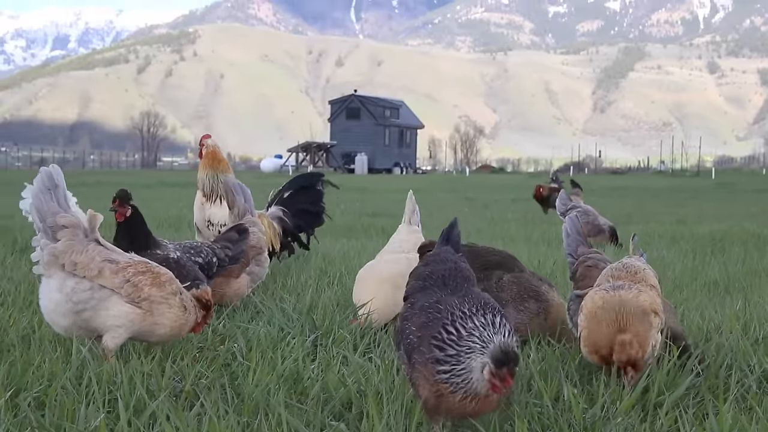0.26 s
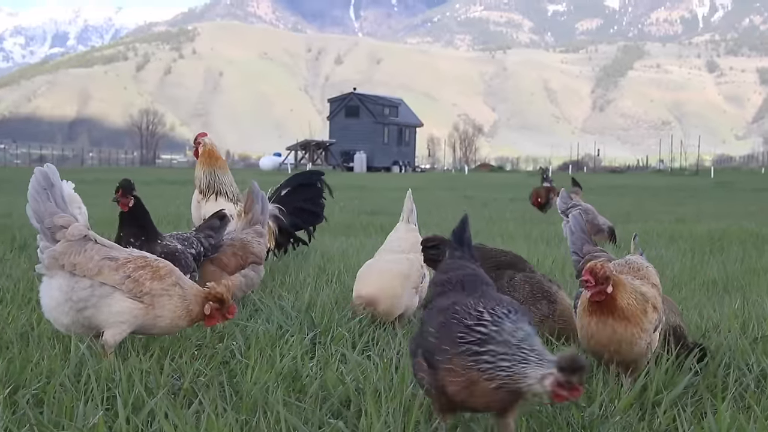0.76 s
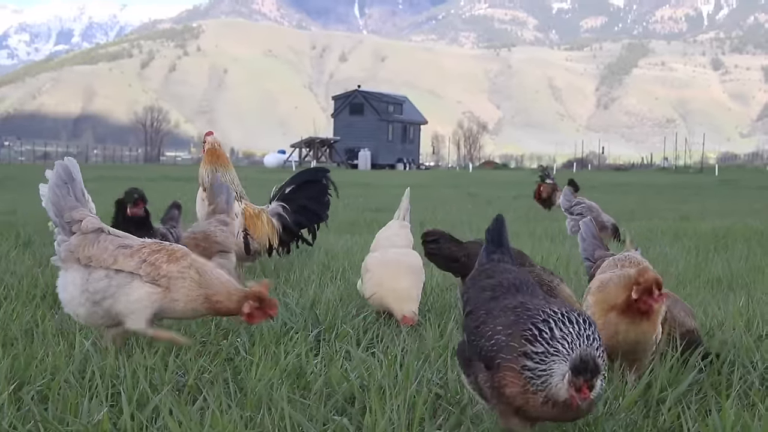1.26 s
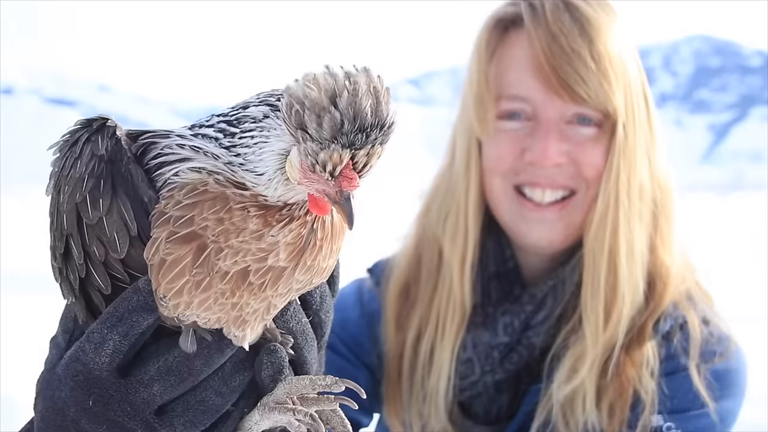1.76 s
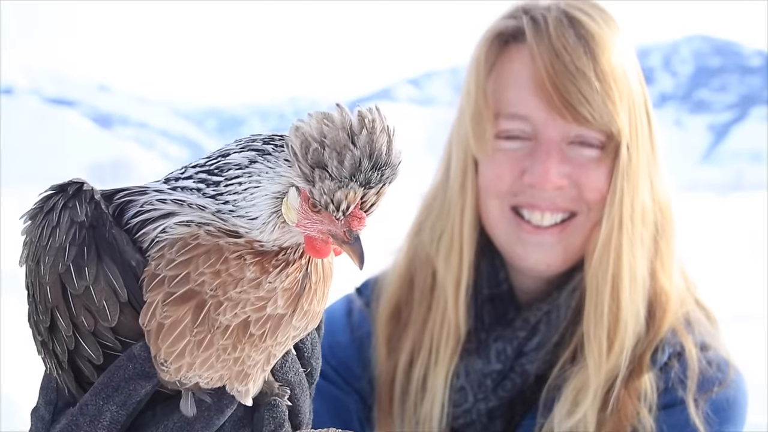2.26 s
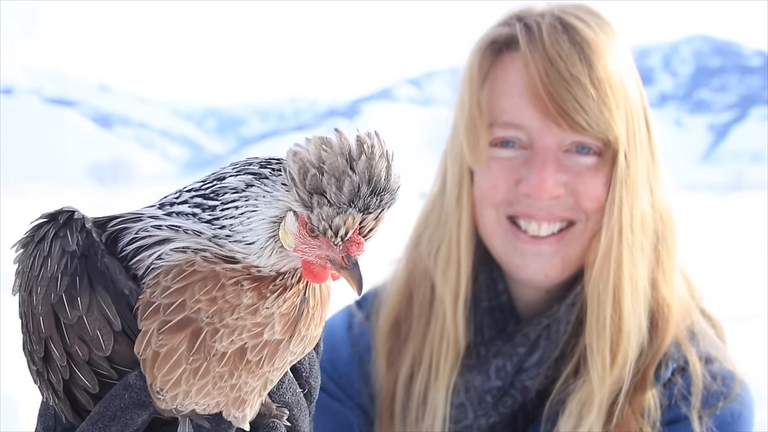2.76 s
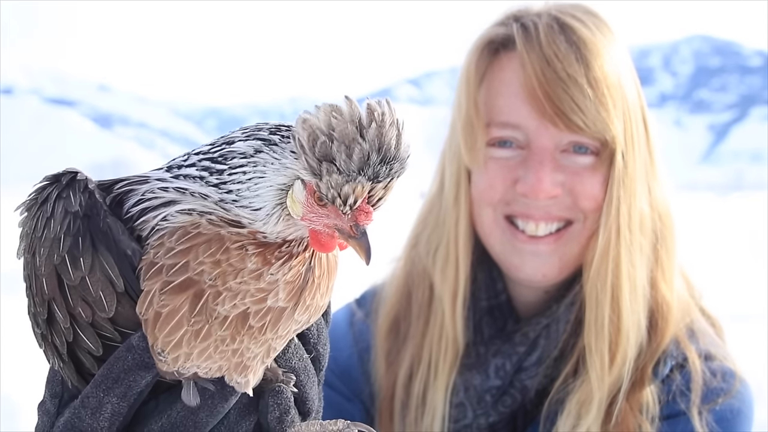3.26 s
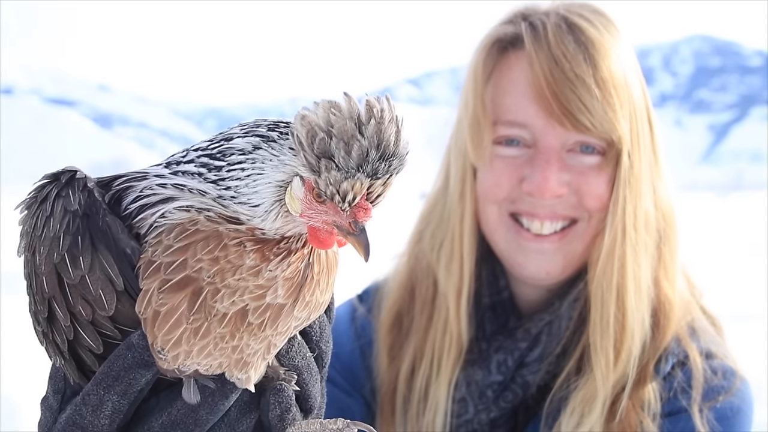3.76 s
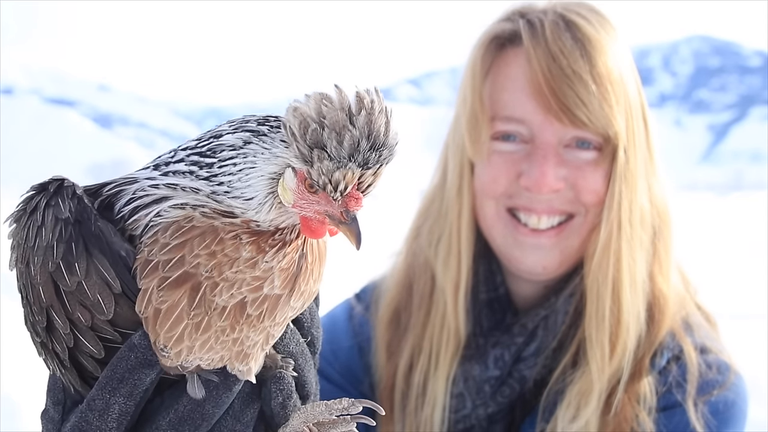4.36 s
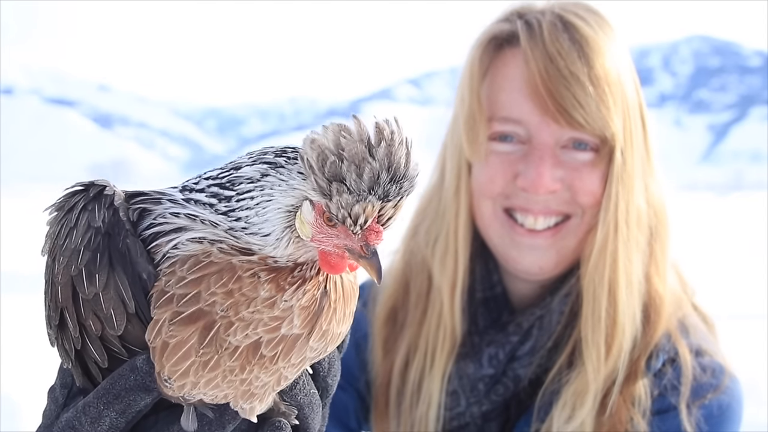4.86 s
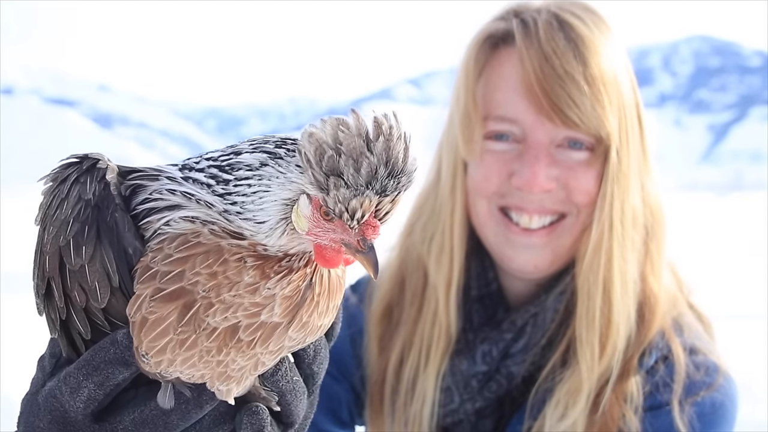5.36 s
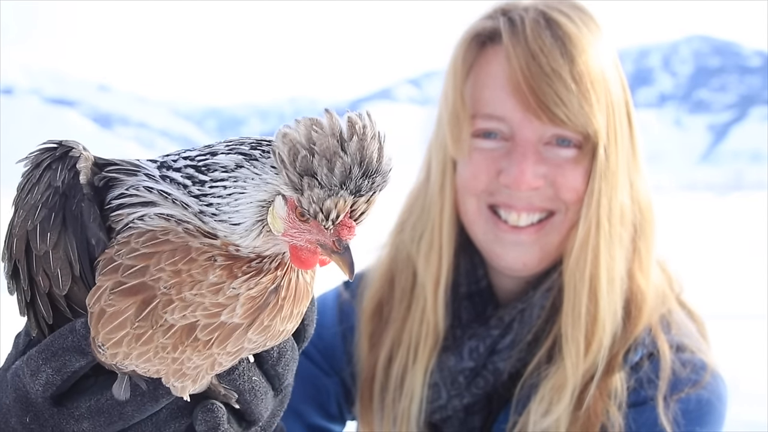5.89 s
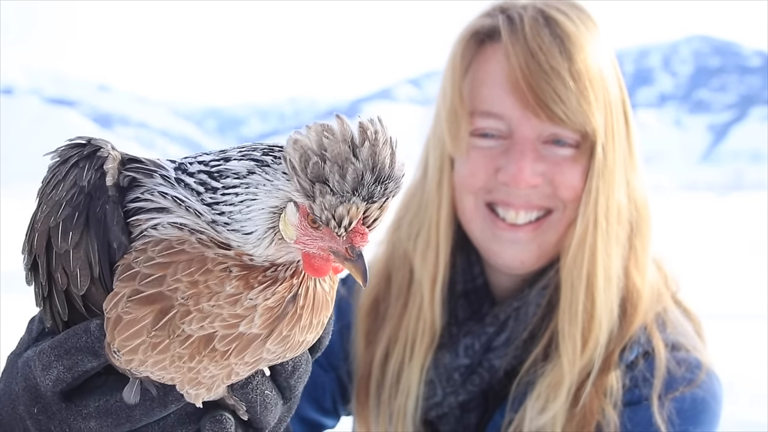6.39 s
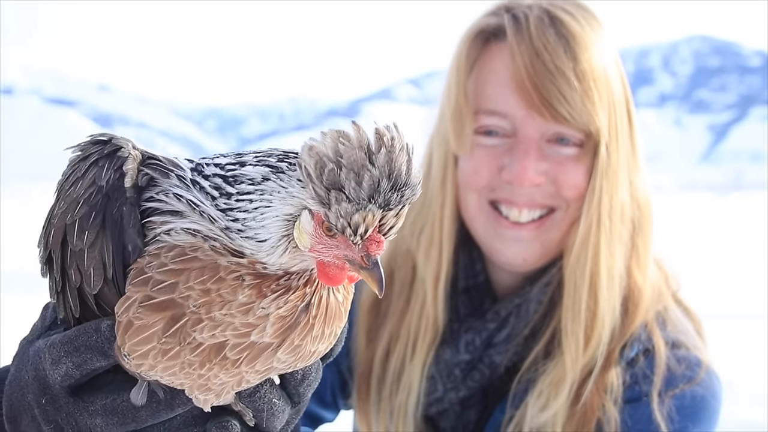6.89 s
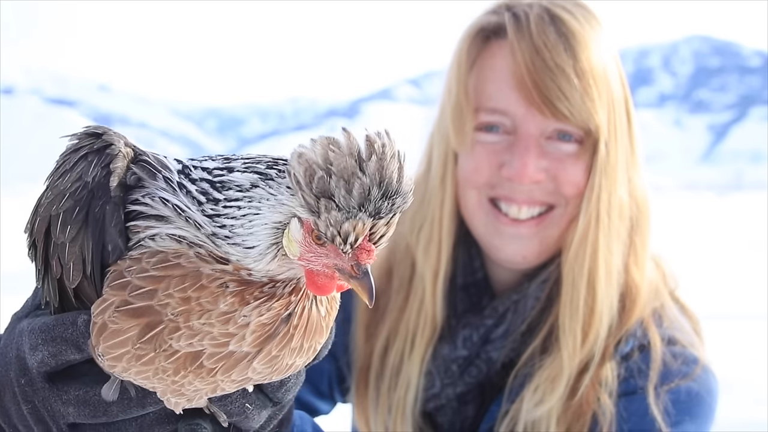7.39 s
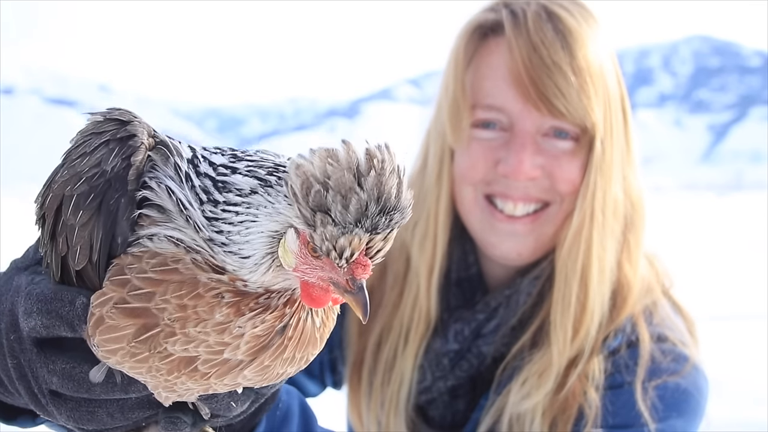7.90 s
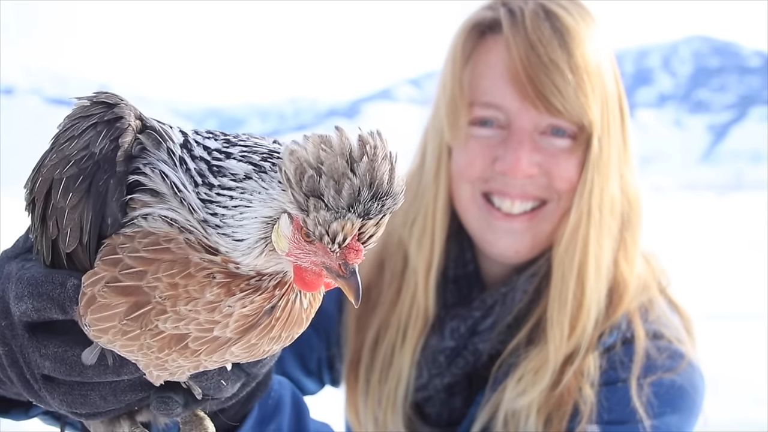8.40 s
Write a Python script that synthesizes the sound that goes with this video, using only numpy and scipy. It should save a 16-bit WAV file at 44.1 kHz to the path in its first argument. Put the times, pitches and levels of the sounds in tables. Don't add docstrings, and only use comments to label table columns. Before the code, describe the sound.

Wind buffeting rumbles heavily over hens brushing through grass, then stops at a hard edit. Close to the microphone, a hen gives evenly spaced nasal clucks, about four or five per second, interrupted by two rising squawks that break off. The doorway sounds small and dry, with light claw scratches and late wooden thumps. A distant hen, tiny bird chirps and a faint engine sit above low yard hum.

```python
import sys
import numpy as np
from scipy import signal
from scipy.io import wavfile
from scipy.ndimage import uniform_filter1d

SR = 44100
rng = np.random.default_rng(int(sys.argv[2]) if len(sys.argv) > 2 else 0)


def waveform_to_disk(signal):
    frames = np.transpose(np.atleast_2d(signal))
    scaled = np.clip(frames, -1, 1) * 32767
    samples = np.round(scaled).astype(np.int16)
    wavfile.write(sys.argv[1], SR, samples)


def linear_from_db(decibels):
    return 10 ** (np.asarray(decibels, float) / 20)


N = 381024
FIELD_END_S, SHED_START_S = 1.7478, 1.787

# t of top pitch/s, level/dB, top f/Hz, hold/s, rise/s
CLUCKS = [(2.06, -19.5, 475.3, .015, 0.023), (2.307, -21, 447, .035, .023), (2.528, -22, 440, 0.037, .035),
          (2.747, -20, 455.7, 0.028, 0.03), (3.214, -15.5, 539, .026, .028), (3.432, -19.5, 470, .04, .025),
          (3.654, -21.5, 452, .025, .031), (3.929, -26, 373, 0.023, .025), (4.163, -26, 405, 0.017, 0.034),
          (4.411, -28.5, 392, 0.015, .021), (5.249, -22.5, 452.4, .03, 0.019), (5.939, -26, 387, .02, .025),
          (6.148, -25.5, 436.7, .028, .028), (6.352, -24.5, 439, .03, 0.021),
          (6.582, -22, 465.3, 0.034, .028), (7.017, -18.5, 557, .03, .022), (7.222, -16, 485, 0.028, .029),
          (7.442, -21.5, 455.6, 0.025, .028), (7.688, -22.5, 450, .028, 0.03),
          (7.883, -20.5, 458.1, .04, .018), (8.111, -20, 452.7, .032, .028), (8.336, -20, 458, .035, .032),
          (8.53, -20.5, 449, .033, .022)]
# t of top pitch/s, level/dB, top f/Hz, hold/s, rise/s
CATCH_BREATHS = [
    (1.798, -22.5, 442.4, 0.027, .009),
    (2.08, -21, 451.6, 0.018, .0077),
    (3.04, -22.5, 472, .03, .006),
    (3.241, -21.5, 482, 0.018, .006),
    (7.463, -21.5, 468, 0.012, .005),
]
# t of top pitch/s, level/dB, top f/Hz, hold/s, rise/s
FAR_CLUCKS = [
    (3.786, -50, 461, 0.039, 0.026),
    (4.606, -43.5, 445, .035, 0.011),
    (4.851, -49.5, 404, 0.016, .01),
    (5.041, -45, 453, 0.035, .017),
    (5.485, -44, 460, 0.035, .02),
    (5.74, -45.5, 451, .04, .018),
]
# t/s, level/dB, f/Hz
SQUAWKS = [
    [(2.808, -22.5, 450), (2.819, -16, 591), (2.85, -12, 616.7), (2.88, -15.5, 629.2), (2.968, -13, 642),
     (2.984, -15.5, 685.5), (2.997, -14, 688), (3.018, -21.5, 643), (3.04, -23.5, 492)],
    [(6.635, -21, 508), (6.646, -14.5, 609.3), (6.7, -12.5, 617.2), (6.75, -16.5, 621.8),
     (6.772, -22.5, 633), (6.79, -13, 649), (6.828, -14, 676.6), (6.838, -23.5, 647), (6.866, -24.5, 528)],
]
# t/s, level/dB, f/Hz
FAR_SQUAWKS = [
    [(4.55, -58.5, 609), (4.585, -51.5, 662), (4.68, -56, 676), (4.74, -63, 670), (4.77, -62, 616)],
    [(6.89, -37.5, 657), (6.95, -36.5, 675), (7.03, -38.5, 683), (7.11, -54, 672)],
]
# t/s, level/dB, f/Hz
CROAK = [
    (1.829, -30.5, 220.7),
    (1.85, -29.5, 201.4),
    (1.869, -39, 194),
]
# f/Hz, level/dB
SHUT_BEAK = [(150, -20), (450, -14.5), (900, 8.5), (1150, 8.5), (1400, -16), (1600, -24), (1900, -25),
             (2300, -22), (2750, -33), (3300, -21), (3750, -25), (4500, -40), (6000, -53), (16000, -72)]
# f/Hz, level/dB
OPEN_BEAK = [(300, -30.5), (620, -17.5), (700, -19), (950, 7), (1300, -3.5), (1450, -14.5), (1850, -30.5),
             (2100, -20), (2600, -22), (3300, -27), (4200, -33.5), (6000, -44), (10000, -54), (16000, -70)]
# f/Hz, level/dB
FAR_PIPE = [(300, -29), (670, -10.5), (900, 11), (1350, 0.5), (1650, -22), (2050, -17), (2700, -25),
            (4000, -29), (16000, -62)]
# f/Hz, level/dB
LOW_THROAT = [(100, -13), (240, 5), (550, -10), (1000, 4), (1450, -19), (2000, -10.5), (2500, -33),
              (3300, -17.5), (4200, -41), (16000, -58.5)]
# f/Hz, t60/s
SHED_T60 = [(200, 0.072), (900, 0.091), (2000, 0.18), (8000, 0.026)]
# t/s, peak level/dB, f/Hz, t60/s, boom level/dB
THUMPS = [
    (3.871, -35.5, 215.7, 0.15, -40.5),
    (7.006, -24.5, 156.6, 0.017, -43.5),
    (7.862, -15.5, 290.3, 0.015, -74),
    (8.013, -25, 201, 0.073, -43.5),
    (8.086, -26.5, 217, 0.083, -44.5),
    (8.403, -37.5, 274, 0.073, -54.5),
]
# t/s, peak level/dB, centre f/Hz, t60/s
TICKS = [(0.1065, -39.5, 2000, 0.02), (0.3954, -36, 1670, 0.02), (0.474, -47, 1500, 0.016),
         (0.9367, -27, 3600, 0.013), (1.5776, -18.5, 3690, 0.007), (1.5977, -29.5, 1860, 0.013),
         (3.8027, -32, 3060, 0.037), (3.8122, -30.5, 2830, 0.022), (3.8332, -36.5, 2720, 0.034),
         (3.8688, -35, 2740, 0.028), (3.896, -35.5, 2990, 0.0245), (7.862, -31, 1510, 0.017),
         (8.401, -37.5, 1700, 0.042)]
# t/s, level/dB, centre f/Hz, t60/s
SCUFFS = [
    (1.787, -42, 1520, 1.3),
    (8.005, -42.5, 1800, 0.26),
    (3.872, -23, 216, 0.51),
    (21, -28.5, 200, 0.52),
]
# t/s, gust level/dB
WIND = [(0.0, -40.5), (0.102, -40.5), (0.306, -19), (0.398, -22.5), (0.424, -2.5), (0.472, -18),
        (0.536, 1.5), (0.56, -15), (0.612, -13.5), (0.676, -28.5), (0.75, -21.5), (0.926, -35),
        (0.964, -17.5), (1.096, -18.5), (1.218, -27.5), (1.31, -23.5), (1.344, -36.5), (1.75, -20.5)]
# f/Hz, level/dB per Hz
GUST = [(9.4, -39), (16, 11.5), (32, 1.5), (60, -26), (78, -60), (130, -120)]
# f/Hz, level/dB per Hz
BUFFET = [(24, -40.5), (40, -4), (113, -12), (156, -21), (198, -23.5), (400, -54), (520, -48), (880, -120)]
# f/Hz, level/dB per Hz
SWISH = [(150, -13), (250, -9), (407, -11.5), (441, -12), (1210, -14.5), (4000, -29.5), (5200, -50),
         (8800, -120)]
# f/Hz, level/dB per Hz
HISS = [(1760, -6.5), (3000, -3.5), (3640, -2.5), (4210, -7), (4670, -4.5), (7210, -9.5), (13100, -7),
        (15600, -11.5)]
# f/Hz, side minus mid level/dB
FIELD_SIDE = [(60, -43.5), (180, -39), (550, -25), (1650, -25.5), (4970, -12.5), (15000, -5)]
# t/s, length/s, level/dB, brightness/dB
RUSTLES = [
    (0.0, 0.18, -67, 7),
    (0.388, 0.035, -39, -18),
    (.4, 0.14, -56.5, 3.5),
    (0.548, 0.27, -50.5, 0),
    (0.8, 0.28, -56.5, 4),
    (0.968, 0.36, -44.5, -8.5),
    (1.237, 0.19, -55.5, 1.5),
    (1.363, 0.18, -52.5, 1),
    (1.56, 0.088, -52.5, -2),
    (1.65, 0.25, -54, 2),
]
# t/s, level/dB, f/Hz
CHIRPS = [
    [(7.275, -77, 4270), (7.295, -61, 4130), (7.32, -65, 2550), (7.35, -54, 2068)],
    [(7.32, -60, 2800), (7.34, -58, 2717), (7.37, -65.5, 2650)],
    [(4.31, -64, 2150), (4.33, -66, 2050), (4.355, -79, 1700)],
    [(4.23, -66, 3946), (4.245, -65, 3900), (4.265, -74, 3600)],
]
# t/s, level/dB, firing f/Hz
DRONES = [
    [(5.25, -59, 75.92), (5.7, -63, 96.2), (5.95, -58, 100.9), (6.2, -57, 117.2)],
    [(7.45, -60.5, 115.7), (7.65, -56, 133.9), (8.1, -53.5, 135.3), (8.55, -63.5, 133)],
]
# multiple of firing f, level/dB
ENGINE_ORDERS = [(2, 0.5), (3, -3), (4, -2)]
# f/Hz, level/dB per Hz
YARD = [(15, -41.5), (25, -19), (59, -10.5), (126, 0), (247, -1), (401, 2.5), (600, -4), (899, -2.5),
        (1350, -14.5), (1630, -20), (2790, -23.5), (11900, -26.5), (15600, -25.5)]
# f/Hz, side minus mid level/dB
YARD_SIDE = [(60, -15.5), (180, -30.5), (550, -35), (1650, -11.5), (4970, -3), (15000, -4)]

START_PITCH, MID_PITCH, FADE_PITCH, SAG_PITCH = 0.64, 0.89, 0.945, 0.86
START_DB, MID_DB, HOLD_DB, FADE_DB, END_DB = -18.5, -8, 0.36, -4, -18.5
ROUGH_RISE, ROUGH_TOP, ROUGH_END = 0.17, 0.05, 0.18
BEAK_DB, BEAK_DB_PER_HZ, REST_HZ = -3, 0.0723, 450
NEAR_ROUGH, FAR_ROUGH, ROUGH_FALL_S, ROUGH_CLIMB_S, ROUGH_MOST = 0.015, 0.085, 0.046, 0.0027, 0.25
HAZE, HAZE_PER_ROUGH = 0.16, 3.2
BUFFET_DB, BUFFET_DB_PER_GUST_DB = -12.5, 1.065
DIAPHRAGM_LIMIT = 0.78
SWISH_REST_DB, HISS_REST_DB, RUSTLE_RISE_SHARE = -56.5, -57.5, 0.28
YARD_DB = -50


def hens():
    near, far = np.zeros((2, N))
    for track, colour, clucks in ((near, SHUT_BEAK, CLUCKS + CATCH_BREATHS), (far, FAR_PIPE, FAR_CLUCKS)):
        pipe = windpipe(colour)
        for row in clucks:
            add(track, *cluck(pipe, *row))
    for track, colour, rough, calls in ((near, OPEN_BEAK, NEAR_ROUGH, SQUAWKS),
                                        (far, FAR_PIPE, FAR_ROUGH, FAR_SQUAWKS),
                                        (near, LOW_THROAT, FAR_ROUGH, [CROAK])):
        pipe = windpipe(colour)
        for rows in calls:
            add(track, *squawk(pipe, rows, rough))
    no_bass = signal.butter(2, 170, "highpass", fs=SR, output="sos")
    near = signal.sosfilt(no_bass, near)
    near_tail = linear_from_db(-11.0) * shed(near, first_s=0.002938)
    far_tail = linear_from_db(-15.0) * shed(far, first_s=0.0055)
    return near + near_tail + linear_from_db(-0.5) * far + far_tail


def cluck(pipe, top_s, db, hz, hold_s, rise_s):
    beak_db = BEAK_DB + BEAK_DB_PER_HZ * (hz - REST_HZ)
    arch = [(top_s - rise_s, db + START_DB, START_PITCH * hz, beak_db - 2, ROUGH_RISE),
            (top_s - 0.457 * rise_s, db + MID_DB, MID_PITCH * hz, beak_db - 1, ROUGH_RISE),
            (top_s, db, hz, beak_db, ROUGH_TOP),
            (top_s + 0.45 * hold_s, db + HOLD_DB, hz, beak_db, ROUGH_TOP),
            (top_s + 0.8 * hold_s, db + FADE_DB, FADE_PITCH * hz, beak_db, ROUGH_TOP),
            (top_s + hold_s, db + END_DB, SAG_PITCH * hz, beak_db + 4.5, ROUGH_END)]
    return voice(arch, pipe)


def squawk(pipe, rows, held_rough):
    s, db, hz = np.transpose(rows)
    slide = np.diff(np.log(hz)) / np.diff(s)
    slide = np.append(slide[0], slide)
    extra = np.maximum(-ROUGH_FALL_S * slide, ROUGH_CLIMB_S * slide)
    rough = np.minimum(held_rough + extra, ROUGH_MOST)
    return voice(np.transpose([s, db, hz, 0 * s, rough]), pipe)


def voice(rows, pipe):
    s, (effort_db, hz, beak_db, rough) = unroll(rows)
    wobble, shake = drift(2, len(hz), step=60)
    rough = np.clip(rough, 0, 1)
    turns = np.cumsum(hz * (1 + 0.38 * rough * wobble)) / SR
    k = np.arange(1, 1 + int(15000 / hz.max()))[:24, None]
    treble = np.clip(k * hz / 1500 - 1, 0, 1)
    flicker_db = 3.75 * drift(len(k), len(hz), step=450)
    beak = linear_from_db(treble * (beak_db + flicker_db))
    weight = pipe[(k * hz / 2).astype(int)] * beak
    breath = (HAZE + HAZE_PER_ROUGH * rough) * treble * drift(len(k), len(hz), step=42)
    partials = (weight * (1 + breath) * np.exp(2j * np.pi * k * turns)).real
    tone = partials.sum(0) / np.sqrt(0.5 * (abs(weight) ** 2).sum(0))
    level = linear_from_db(effort_db + 13.0 * rough * shake)
    return s, level * tone * signal.windows.tukey(len(hz), 200 / len(hz))


def windpipe(colour):
    hz = abs(np.fft.fftfreq(SR // 2, 1 / SR))
    log_gain = np.log(linear_from_db(read(colour, hz)))
    return np.exp(signal.hilbert(log_gain).conj())


def shed(x, first_s):
    taps = np.zeros(SR // 2)
    at = np.arange(round(first_s * SR), len(taps) - 40, 40)
    taps[at + rng.integers(0, 40, len(at))] = rng.choice([-1.0, 1.0], len(at))
    hz, t, z = signal.stft(taps, SR, nperseg=256)
    decay = linear_from_db(-60 * t / read(SHED_T60, hz)[:, None])
    tail = signal.istft(z * decay, SR, nperseg=256)[1]
    return signal.fftconvolve(x, tail / np.linalg.norm(tail))[:N]


def feet():
    out, t = np.zeros(N), np.arange(SR // 2) / SR
    for s, db, hz, t60, boom_db in THUMPS:
        board = np.sin(2 * np.pi * hz * t) * linear_from_db(db - 60 * t / t60)
        boom = np.sin(2 * np.pi * 62 * t) * linear_from_db(boom_db + 3.5 - 60 * t / 0.6)
        add(out, s, (board + boom) * np.minimum(t / 0.002, 1))
    for s, db, hz, t60 in TICKS + SCUFFS:
        band = signal.butter(2, [hz / 1.8, hz * 1.5], "bandpass", fs=SR)
        burst = evened(signal.lfilter(*band, rng.standard_normal(len(t))))
        add(out, s, linear_from_db(db - 10.5 - 60 * t / t60) * burst)
    return out


def field():
    _, (gust_db,) = unroll(WIND)
    length = len(gust_db)
    wind = linear_from_db(gust_db) * noise(GUST, FIELD_SIDE, length, patchy_db=0, size=4096)
    buffet_db = BUFFET_DB + BUFFET_DB_PER_GUST_DB * gust_db
    wind += linear_from_db(buffet_db) * noise(BUFFET, FIELD_SIDE, length, patchy_db=5.5, size=2048)
    limited = wind / (1 + (wind / DIAPHRAGM_LIMIT) ** 4) ** 0.44
    return limited + grass(length)


def grass(length):
    swish, hiss = rustling(length)
    blades_db = 1.5 * evened(uniform_filter1d(rng.standard_normal(length), size=300))
    sound = swish * noise(SWISH, FIELD_SIDE, length, patchy_db=2.5, size=512)
    sound += hiss * noise(HISS, FIELD_SIDE, length, patchy_db=0, size=512)
    return sound * linear_from_db(blades_db)


def rustling(length):
    t = np.arange(length) / SR
    power = np.ones((2, length)) * linear_from_db([[2 * SWISH_REST_DB], [2 * HISS_REST_DB]])
    for s, span, db, bright_db in RUSTLES:
        swell = np.interp(t, [s, s + RUSTLE_RISE_SHARE * span, s + span], [0, 1, 0])
        power += swell * linear_from_db([[2 * db], [2 * (db + bright_db)]])
    return np.sqrt(power)


def bird():
    return sliding_tones(CHIRPS, [(0.95, 0.015)])


def engine():
    return sliding_tones(DRONES, ENGINE_ORDERS)


def sliding_tones(tables, orders):
    out = np.zeros(N)
    for rows in tables:
        s, (db, hz) = unroll(rows)
        jitter = evened(uniform_filter1d(rng.standard_normal(len(hz)), size=900))
        turns = np.cumsum(hz * (1 + 0.024 * jitter)) / SR
        tone = sum(linear_from_db(order_db) * np.sin(2 * np.pi * k * turns) for k, order_db in orders)
        add(out, s, np.sqrt(2) * linear_from_db(db) * tone * signal.windows.tukey(len(hz), 0.2))
    return out


def yard():
    return linear_from_db(YARD_DB) * noise(YARD, YARD_SIDE, N, patchy_db=3.0)


def noise(colour, side, length, patchy_db, size=1024):
    hz = np.fft.rfftfreq(size, 1 / SR)[:, None]
    a, b, c, d, patches = rng.standard_normal((length * 4 // size + 5, len(hz), 5)).T
    patches = uniform_filter1d(patches, size=12, axis=0)
    patches = evened(uniform_filter1d(patches, size=8, axis=1))
    common = a + 1j * b
    apart = (c + 1j * d) * linear_from_db(read(side, hz))
    level = linear_from_db(read(colour, hz) + patchy_db * patches / (1 + hz / 2500))
    z = np.array([common + apart, common - apart]) * level
    return evened(signal.istft(z, nperseg=size, noverlap=size * 3 // 4)[1][:, :length])


def drift(count, length, step):
    knots = rng.standard_normal((count, int(length / step) + 2))
    place = np.arange(length) / step
    knot, part = place.astype(int), place % 1
    return knots[:, knot] * (1 - part) + knots[:, knot + 1] * part


def evened(x):
    return x / np.sqrt(np.mean(x ** 2) + 1e-20)


def read(points, hz):
    f, value = np.transpose(points)
    return np.interp(np.log(hz + 1), np.log(f + 1), value)


def unroll(rows):
    s, *columns = np.transpose(rows)
    t = np.arange(s[0], s[-1], 1 / SR)
    return s[0], [np.interp(t, s, c) for c in columns]


def add(mix, s, sound):
    part = mix[..., round(s * SR):][..., :sound.shape[-1]]
    part += sound[..., :part.shape[-1]]


def scene():
    t = np.arange(N) / SR
    mix = yard() * (t > SHED_START_S)
    add(mix, 0, field())
    mix = mix + hens() + feet() + bird() + engine()
    fade_in = np.clip((t - SHED_START_S) / 0.006, 0, 1)
    return mix * np.where(t < FIELD_END_S, 1, fade_in)


def band_limit(x):
    return signal.sosfilt(signal.butter(12, 15780, fs=SR, output="sos"), x)


def record(dry):
    return band_limit(dry)


dry = scene()
out = record(dry)
waveform_to_disk(out)
```